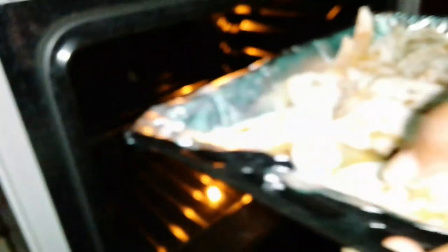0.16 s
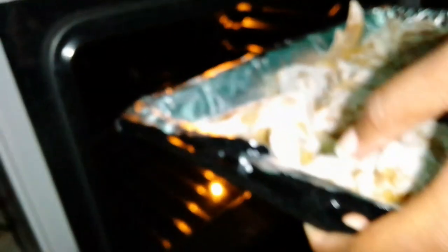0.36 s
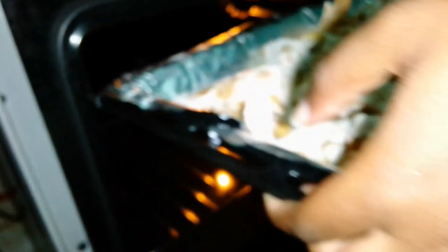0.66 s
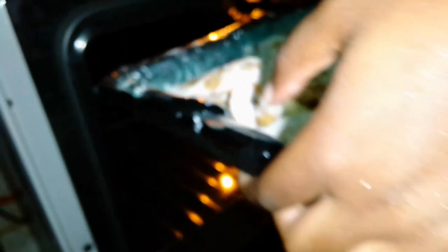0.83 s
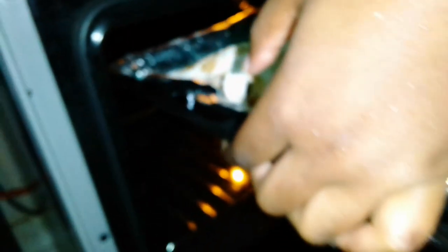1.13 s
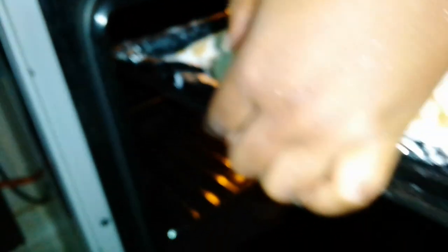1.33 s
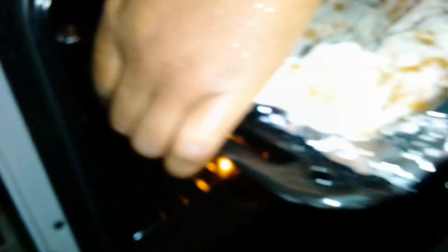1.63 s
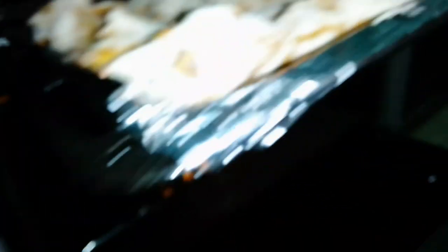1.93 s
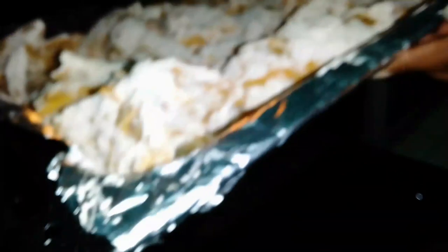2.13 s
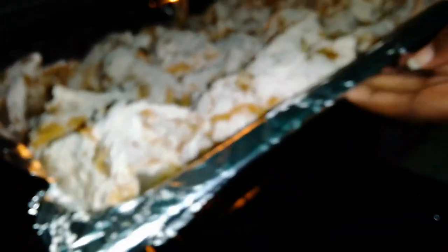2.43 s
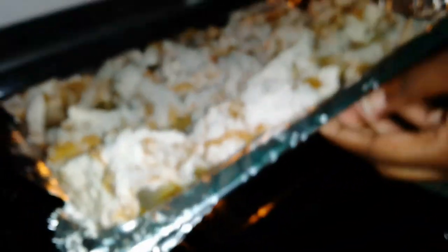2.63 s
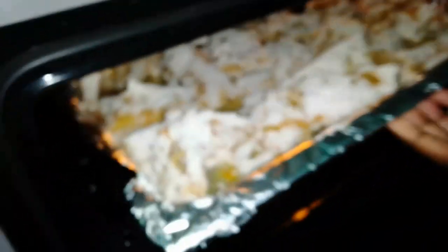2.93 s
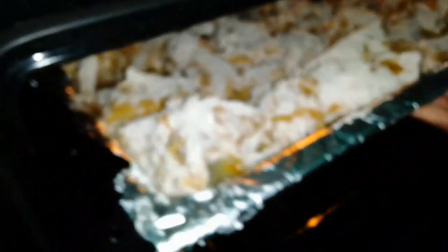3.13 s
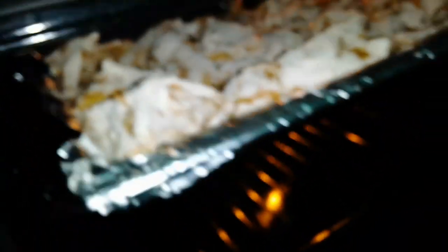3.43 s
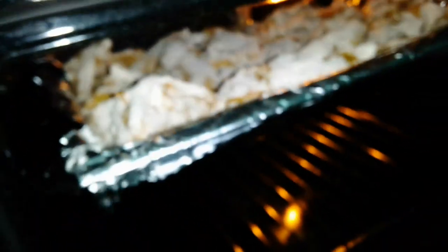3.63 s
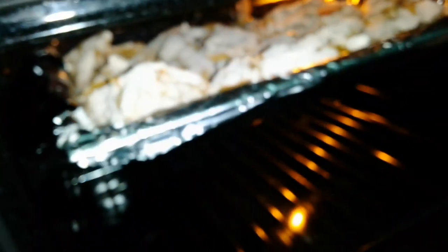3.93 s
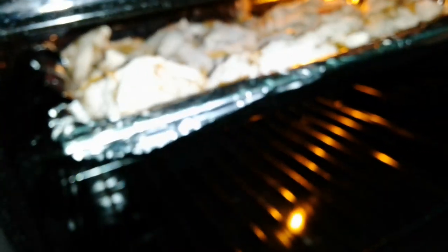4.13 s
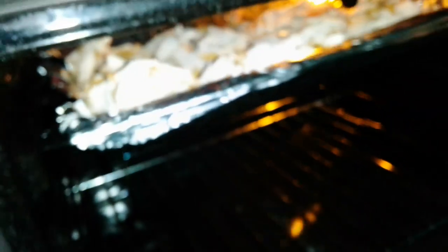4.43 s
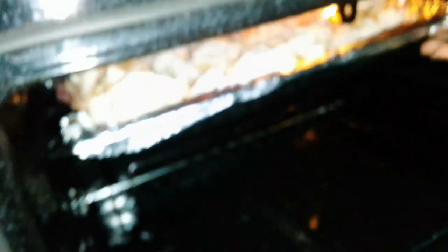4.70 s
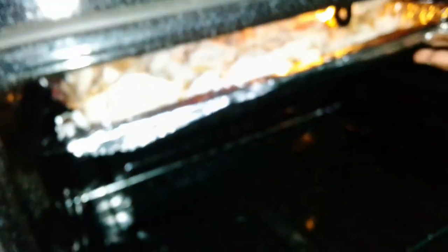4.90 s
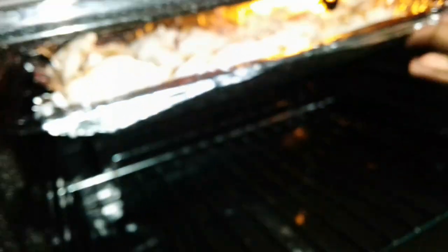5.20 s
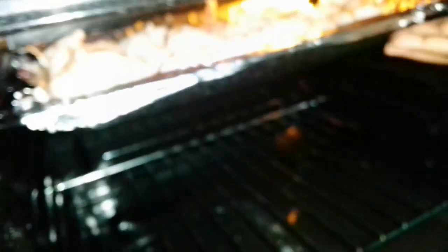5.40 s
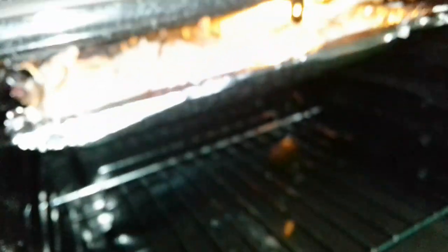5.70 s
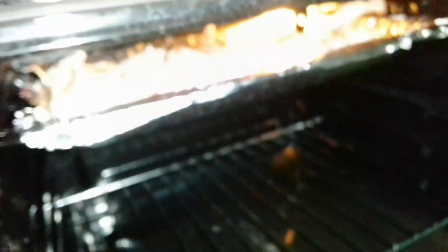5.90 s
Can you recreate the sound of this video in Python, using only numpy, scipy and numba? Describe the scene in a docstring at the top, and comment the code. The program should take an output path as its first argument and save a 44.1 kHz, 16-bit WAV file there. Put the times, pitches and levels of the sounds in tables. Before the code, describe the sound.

A quiet kitchen hiss with faint rubbing lasts barely 0.1 s before a foil-lined tray bangs on the oven rack: a hard, roaring metallic crash with a low boom, fading over about half a second. Foil crackles lightly at 0.3-0.8 s, then gives a sharp bright crinkle with a brief high squeal at 0.9 s. After a lull, a clank at 1.47 s starts dense foil crunching, scraping, squeals and low tray hums until about 2.3 s. A hard, bright clank hits at 2.56 s, followed by grinding, small thuds and a cluster of strong rattling clanks at 3.0-3.2 s. Lighter taps and a faint hum follow until 4.2 s. A dull, hollow thud lands at 4.42 s with a short low scrape and hum, then a small clink at 4.83 s. Tiny ticks remain over hiss, briefly dipping near 5.4 and 5.9 s. The phone is close; the oven adds a short tail.

```python
"""Over a quiet kitchen hiss with faint rubbing, a foil-lined metal tray soon bangs on an oven rack.
It then crinkles in the hands, scrapes, squeals, hums, rattles and thuds along the bars.
Noisy contact forces ring the foil, the tray's rim, sheet and base, the rack bars and the oven floor.
The oven adds a short tail to this handling; the bang is a fading roar of noise with a low boom.
The whole level dips briefly twice near the end, and a phone close by colours the sound."""
import sys
import numpy as np
from scipy import signal
from scipy.fft import rfft, irfft
from scipy.io import wavfile
from numba import njit

SR = 44100
rng = np.random.default_rng(int(sys.argv[2]) if len(sys.argv) > 2 else 0)


def generate_wav(signal):
    """Clip the signal to [-1, 1] and save it as 16-bit WAV at the path in sys.argv[1]."""
    frames = np.transpose(np.atleast_2d(signal))
    scaled = np.clip(frames, -1, 1) * 32767
    pcm = np.round(scaled).astype(np.int16)
    wavfile.write(sys.argv[1], SR, pcm)


N = 266849
T = np.arange(N) / SR  # time of every sample, s

# colour of the kitchen hiss: (frequency [Hz], relative level per Hz [dB])
HISS_COLOUR = [(15, -50), (25, -22), (80, -13), (170, -19), (354, -8), (607, -22.5), (734, -16.5),
               (962, -19.5), (2220, -21), (2550, -25), (16000, -26.5)]
HISS_DB = -62.5  # average (rms) level
# brief dips of the whole scene: (time [s], level [dB])
LEVEL_DIPS = [(5.36, 0), (5.37, -27), (5.41, -12.5), (5.47, -1.5), (5.885, -1), (5.895, -21.5), (6.02, -23),
              (6.05, -7.5)]
OVEN_T60_S, OVEN_DB = 0.28, -9  # time for the tail to fall 60 dB, and its level

# small ticks of settling metal: (time [s], level [dB])
TICKS = [(5.061, -45.5), (5.077, -43.5), (5.225, -55)]
TICK_HZ, TICK_WIDTH_HZ = 1296, 600

# colour of the first bang: (frequency [Hz], relative level per Hz [dB])
BANG_COLOUR = [(47, -57), (80, -32.5), (154, -8.5), (387, 0.5), (747, -7.5), (1160, -3), (1440, -13.5),
               (1750, -5.5), (2900, -10), (3240, -17.5), (5240, -6.5), (7120, -25.5), (15000, -54)]
# how fast each pitch of the bang dies: (frequency [Hz], time to fall 60 dB [s])
BANG_FADE = [(150, 0.6), (400, 0.63), (1040, 0.34), (2760, 0.26), (7000, .3), (9000, 0.15), (14000, .12)]
BANG_S, BANG_HOLD_S, BANG_RISE_S = .0873, 0.029, .0015
BANG_DB, BOOM_DB, BOOM_T60_S = -10, -15, 0.4

# ringing modes of each body; the wide rows stand for many close modes
# oven floor: (frequency [Hz], width [Hz], relative level [dB])
OVEN_FLOOR_MODES = [(59.97, 76, -23.5), (113, 22, -9), (221, 14, -5), (269, 22, -2.5), (279, 22, -2.5)]
# base of the tray: (frequency [Hz], width [Hz], relative level [dB])
TRAY_MODES = [(357, 37, -2.5), (386, 79, -3.5), (425, 26, 2.5), (467, 18, -5.5), (492, 15, -1),
              (536, 26, -6.5)]
# thin sheet of the tray: (frequency [Hz], width [Hz], relative level [dB])
SHEET_MODES = [(609, 15, -3.5), (700, 26, 3.5), (750, 42, -7.5), (872, 80, 0.5), (982, 110, -4),
               (1006, 110, 0.5), (1140, 54, -3.5), (1282, 200, -2.5), (893, 1200, -6.5)]
# rack bars: (frequency [Hz], width [Hz], relative level [dB])
BAR_MODES = [(1705, 9.6, -12), (1945, 70, -15), (1980, 110, -5.5), (2244, 190, -0.5), (2259, 160, 3),
             (2562, 92, -9.5), (3120, 110, -9), (2330, 1400, -7.5)]
# rim of the tray: (frequency [Hz], width [Hz], relative level [dB])
RIM_MODES = [(3337, 79, -9.5), (3730, 40, 4), (4200, 13, -12), (4890, 40, 4), (4530, 3200, -4)]
# foil: (frequency [Hz], width [Hz], relative level [dB])
FOIL_MODES = [(5320, 180, -3), (5810, 27, 0), (5444, 240, -2.5), (5840, 330, 1.5), (6130, 220, -2.5),
              (6550, 190, 3), (7560, 280, -14.5), (7840, 140, -11), (6375, 2800, -8)]
# bright crackle at the top: (frequency [Hz], width [Hz], relative level [dB])
CRACK_MODES = [(8900, 600, 2.5), (9350, 14000, 4), (11500, 6700, -13.5)]
WANDER_DB, WANDER_PER_S = 3.0, 14  # random spread of a mode's drive, and new values per second

# narrow drifting tones: squeals, tray hum and ringing of the metal under contact:
# (start [s], end [s], first pitch [Hz], last pitch [Hz], first level [dB], last level [dB])
DRIFTING_TONES = [(0.91, 1.03, 6250, 6000, -24, -40.5), (1.236, 1.44, 1430, 1860, -62, -57),
                  (1.487, 1.654, 1990, 2380, -33.5, -45.5), (1.683, 1.93, 2490, 2090, -25.5, -54.5),
                  (1.793, 2.037, 5830, 5860, -34.5, -39.5), (1.99, 2.2, 1270, 1280, -32.5, -53.5),
                  (1.492, 1.628, 500, 517, -36.5, -51.5), (1.661, 1.905, 502.5, 529, -34, -56.5),
                  (1.983, 2.194, 467, 440, -38, -46.5), (2.583, 3.006, 600, 695, -48.5, -40),
                  (2.64, 2.825, 5250, 5360, -27, -46), (2.638, 2.977, 2325, 2440, -49, -35.5),
                  (2.99, 3.216, 2500, 2220, -34, -40.5), (3.325, 3.491, 2346, 2354, -32, -48.5),
                  (3.617, 4.16, 452, 453, -48, -57.5), (4.588, 4.758, 385, 337, -36, -56),
                  (1.418, 1.618, 7000, 6720, -33, -38.5), (1.7, 1.817, 6900, 6800, -28, -42)]
TONE_WIDTH_HZ, TONE_FADE_S = 110, 0.011
TONE_BREAKUP = 2.2  # power on the wandering drive: higher is more broken

# rubbing pressure: (time [s], on foil [dB], on edge [dB], on bars [dB], on sheet [dB], on base [dB])
RUBBING = [(0.0, -56, -61, -55, -67, -64), (0.12, -44, -51, -63, -52, -63.5),
           (0.25, -71, -59, -64, -59, -37), (0.44, -52, -58, -55.5, -58, -62.5),
           (0.72, -67, -58, -58.5, -57.5, -68.5), (1.2, -49, -67, -54.5, -60.5, -69),
           (1.43, -49, -56, -50.5, -55.5, -61), (1.49, -28, -55, -51, -54, -64),
           (1.57, -30, -62, -64, -53, -57), (1.63, -36.5, -33, -39.5, -53.5, -57),
           (2.03, -46, -53, -43.5, -45.5, -50), (2.3, -49, -45.5, -46.5, -50.5, -56),
           (2.52, -45, -44, -39.5, -46, -56.5), (2.67, -54, -41, -39, -33, -41),
           (2.81, -63, -57, -36.5, -54, -41.5), (3.04, -58, -46, -48.5, -37, -41.5),
           (3.26, -68, -66, -50, -54, -61), (3.47, -69.5, -80, -57, -50.5, -49),
           (3.88, -72, -76, -57, -60.5, -53), (4.16, -78.5, -82.5, -62.5, -61.5, -67.5),
           (4.37, -67, -74, -72.5, -64.5, -61), (4.51, -62, -71, -57, -51, -36.5),
           (4.65, -70, -68.5, -55, -53.5, -43.5), (5.0, -86, -75, -77, -69, -76)]
GRAINS_PER_S, GRAIN_SPREAD_DB = 610, 3
RATTLE_GRAIN = 0.47  # amount of grainy rubbing mixed into the noise of the blows

# creases of the foil:
# (time [s], force on foil [dB], on bars [dB], hold [s], time to fall 60 dB [s])
CREASES = [(.267, -24.5, -34, .0025, 0.064), (0.386, -41.5, -44.5, .005, 0.05),
           (0.533, -50, -57, .009, 0.045), (0.58, -43, -46.5, .008, 0.12), (0.643, -40, -35.5, .011, 0.045),
           (0.785, -41.5, -40.5, .0076, 0.045), (0.9065, -15.5, -60, 0.0018, 0.038),
           (0.914, -32, -55, .007, 0.025), (0.948, -19.5, -36, .003, 0.016), (0.981, -36, -45.5, .011, .03),
           (1.193, -41, -45.5, .009, 0.079), (1.378, -44, -47.5, .035, 0.076),
           (1.415, -24, -34.5, .011, 0.19), (1.447, -21, -30, .006, 0.085), (1.601, -28, -37, .0064, 0.017),
           (1.626, -13.5, -28, .006, .03), (1.705, -15.5, -21.5, .005, 0.051),
           (1.721, -16, -25, .02, 0.056), (1.766, -33, -27, .009, 0.053), (1.92, -23.5, -38, .007, 0.02),
           (2.232, -35, -48, .009, 0.086), (2.28, -27.5, -39, .003, 0.099),
           (2.344, -48.5, -44, .009, 0.095)]
# clanks of the tray on the rack: (time [s], force on edge [dB], on bars [dB], on sheet [dB],
# on base [dB], hold [s], time to fall 60 dB [s])
CLANKS = [(1.061, -57, -49.5, -61, -57, 0.0091, .035), (1.465, -15, -11.5, -48, -28, 0.0063, 0.046),
          (1.485, -30.5, -26, -50, -41, 0.015, 0.096), (1.558, -38, -36.5, -52, -51, 0.0056, 0.024),
          (1.686, -24, -36, -32, -50, 0.014, 0.091), (1.993, -32, -26.5, -29, -37, 0.011, 0.13),
          (2.028, -38, -23, -49, -35, 0.0082, 0.078), (2.098, -40, -24, -30.5, -52.5, 0.0041, 0.015),
          (2.192, -42.5, -63, -69, -51, 0.0053, 0.025), (2.384, -37.5, -41, -47, -44, 0.0053, 0.021),
          (2.488, -40, -30, -34.5, -46.5, 0.018, 0.18), (2.552, -20, -22, -27, -27.5, 0.0084, 0.071),
          (2.563, -5.5, -8, -40, -48, 0.001, 0.0061), (2.592, -20, -18.5, -28.5, -35, 0.0025, 0.088),
          (2.671, -42, -27, -32, -30, 0.0086, 0.034), (2.752, -35.5, -43, -39, -36, .01, 0.036),
          (3.028, -30.5, -15.5, -24.5, -25.5, 0.014, 0.038),
          (3.061, -41, -11.5, -14.5, -25.5, 0.0038, .017), (3.105, -42, -43, -33, -34, 0.021, 0.061),
          (3.158, -33.5, -27, -42, -52, 0.0051, 0.033), (3.175, -33, -22.5, -20.5, -37, 0.0028, 0.018),
          (3.259, -40.5, -32, -46, -40.5, 0.0094, 0.14), (3.334, -40, -33, -58, -41, 0.0033, .04),
          (3.36, -42, -31, -67, -66, 0.0053, 0.11), (3.456, -47.5, -59, -67, -72.5, 0.0045, 0.037),
          (3.472, -45, -37.5, -50, -45, 0.0039, 0.033), (3.61, -74, -45.5, -70, -54, 0.0066, .04),
          (3.697, -54, -47, -54, -48, 0.031, .04), (3.807, -57.5, -49.5, -60, -64.5, 0.0076, .028),
          (4.07, -57.5, -52, -54.5, -59, 0.0036, 0.036), (4.827, -45.5, -39.5, -50, -44.5, 0.01, .05),
          (4.848, -61, -55, -66, -55, 0.017, 0.033), (4.897, -77, -64, -76, -82.5, .0035, 0.038),
          (5.018, -77.5, -60, -73.5, -78, .0065, 0.04), (5.221, -77, -59, -70.5, -75, 0.0094, 0.036),
          (5.494, -83.5, -63.5, -76, -77.5, 0.02, .044), (5.63, -78, -62.5, -59.5, -71, .01, 0.04),
          (5.819, -81, -66.5, -64, -76, .018, .036)]
# thuds of the tray's underside: (time [s], force on bars [dB], on sheet [dB], on base [dB],
# on oven floor [dB], hold [s], time to fall 60 dB [s])
THUDS = [(2.875, -26.5, -41, -31.5, -54.5, 0.0045, 0.033), (2.945, -29, -33, -30, -60, 0.0033, 0.035),
         (3.001, -32.5, -52, -28.5, -71, 0.017, 0.076), (3.639, -54, -42, -52, -66, .003, 0.048),
         (3.733, -65, -39.5, -45, -62.5, 0.0063, .035), (3.75, -47.5, -51.5, -33, -42.5, 0.0023, .027),
         (3.79, -77, -66, -45.5, -71, 0.0044, 0.031), (4.322, -52.5, -45.5, -48.5, -63.5, 0.026, .047),
         (4.353, -52.5, -45, -43, -55.5, .06, .052), (4.413, -42, -33.5, -21, -41, 0.0073, 0.11),
         (4.42, -28.5, -32, -15.5, -24, 0.0012, 0.027), (4.447, -62, -40, -29, -27.5, 0.016, 0.056),
         (4.481, -65, -36, -44, -29, 0.007, 0.053), (4.597, -61, -55, -32.5, -36, .015, 0.025),
         (4.657, -79, -63, -49, -43, 0.0079, .05)]
# sharp snaps of the foil, mostly treble: (time [s], force [dB], hold [s])
SNAPS = [(0.265, -27.5, 0.006), (0.536, -41, 0.0044), (0.585, -46.5, 0.006), (0.647, -31, 0.0079),
         (0.7865, -42, 0.0067), (0.909, -36, 0.006), (0.944, -42, 0.006), (1.3866, -44.5, 0.006),
         (1.413, -34, 0.006), (1.449, -38, 0.006), (1.564, -37.5, 0.0065), (1.606, -34, 0.006),
         (1.6276, -46, 0.006), (1.697, -28, 0.006), (1.879, -44, 0.006), (1.917, -42.5, 0.006),
         (1.9943, -39, 0.006), (2.226, -42, 0.006), (2.281, -37.5, 0.006), (2.35, -38.5, 0.006),
         (2.5614, -18.5, 0.006), (3.02, -43, 0.006), (3.1082, -49, 0.006), (3.164, -35, 0.0067),
         (3.266, -44, 0.006), (3.3342, -43, 0.006), (3.3582, -45, 0.006), (4.832, -47.5, 0.0074)]
SNAP_T60_S = 0.048
CREASE_RISE_S, CLANK_RISE_S, THUD_RISE_S, SNAP_RISE_S = .001, 0.0017, 0.0019, .001
TICK_DB, TICK_S = 4, .002  # extra force around the end of each rise, and its time scale
PUSH_S, PUSH_DB = 0.0014, -7  # a thud opens with a soft push, this far from its force on the base
CLICK_DB = 6.5  # a crease opens with a click, this far above its force on the foil

# the seven forces are numbered in the column order of the next table
FOIL, EDGE, BARS, SHEET, BASE, OVEN_FLOOR, SNAP = range(7)
# how strongly each force reaches each ringing body, one row per body: (from foil [dB], edge [dB],
# bars [dB], sheet [dB], base [dB], oven floor [dB], snap [dB])
REACH_DB = {"foil": (-3, -3.5, -39.5, -56.5, -70.5, -73, -7),
            "crack": (-18, -25, -29, -48.5, -61, -70, -5.5),
            "rim": (-13, -1, -15.5, -40.5, -62, -69, -16.5), "bars": (-41, -39.5, 0, -31, -51, -70, -29.5),
            "sheet": (-51.5, -54, -17, 1, -26.5, -40, -40.5),
            "tray": (-62.5, -60.5, -40, -26.5, -0.5, -18, -61.5),
            "oven floor": (-50.5, -41.5, -38, -32, -16, 0, -60)}

# tone colour of the phone's microphone: (frequency [Hz], level [dB])
MIC_COLOUR = [(30, -1), (120, -4), (200, 3), (7000, 0), (9000, 0.5), (16000, -2.5)]
TOP_HZ = 16050  # almost nothing passes above this
DRIVE = 1.13  # how hard loud peaks are squeezed
OFFSET = -0.0011  # steady voltage of the input stage


def undb(db):
    """Turn decibels into a plain multiplier."""
    return 10 ** (np.asarray(db) / 20)


def unit(x):
    """Scale to an average (rms) size of 1."""
    return x / np.sqrt(np.mean(x ** 2))


def on_log(hz, table):
    """Read a table between its rows, with pitch spaced as the ear hears it."""
    table = np.array(table)
    return np.interp(np.log(hz), np.log(table[:, 0]), table[:, 1])


def ring(x, hz, width_hz):
    """A simple resonance, gain 1 at its centre; a narrower one rings longer."""
    return signal.lfilter(*signal.iirpeak(min(hz, .45 * SR), hz / width_hz, fs=SR), x)


@njit
def glide(x, hz, sharpness):
    """A resonance whose centre moves, gain 1 at the centre."""
    y, band, low = np.empty(len(x)), 0., 0.
    for i in range(len(x)):
        g = np.tan(np.pi * hz[i] / SR)
        v = (band + g * (x[i] - low)) / (1 + g * (g + 1 / sharpness[i]))
        low += 2 * g * v
        band = 2 * v - band
        y[i] = v / sharpness[i]
    return y


def wander():
    """The contact point moves, so a mode is driven now harder, now softer, at random."""
    count = int(N / SR * WANDER_PER_S) + 2
    gain = undb(WANDER_DB * rng.standard_normal(count))
    return np.interp(T * WANDER_PER_S, np.arange(count), unit(gain))


def body(force, modes):
    """A struck body answers with its own modes; white force of rms 1 gives sound of rms near 1."""
    centres = np.array(modes)[:, 0]
    edges = centres.min() / 1.12, min(centres.max() * 1.076, .45 * SR)
    band = signal.butter(3, edges, "band", fs=SR, output="sos")
    force = signal.sosfilt(band, force)
    sound, power = 0, 0
    for k, (hz, width_hz, db) in enumerate(modes):
        sign = (-1) ** k  # neighbouring modes move in opposite directions
        sound = sound + sign * undb(db) * ring(force * wander(), hz, width_hz)
        power += undb(2 * db) * np.pi * width_hz / SR
    return sound / np.sqrt(power)


def hiss():
    """Steady kitchen and microphone noise: random noise given a fixed colour."""
    hz = np.maximum(np.arange(N // 2 + 1) * SR / N, 20)
    noise = irfft(rfft(rng.standard_normal(N)) * undb(on_log(hz, HISS_COLOUR)), N)
    return unit(noise) * undb(HISS_DB)


def oven_tail(dry):
    """Many overlapping echoes in the oven: fading noise smears the sound."""
    t = T[:SR // 3]
    build_up = np.minimum(t / 0.025, 1)
    echoes = rng.standard_normal(len(t)) * undb(-60 * t / OVEN_T60_S) * build_up
    echoes = echoes / np.sqrt(np.sum(echoes ** 2))
    return undb(OVEN_DB) * signal.fftconvolve(dry, echoes)[:N]


def ticks():
    """Settling metal: lone clicks pass twice through one short resonance."""
    click = np.zeros(N)
    for s, db in TICKS:
        click[int(s * SR)] = undb(db) * SR / (np.pi * TICK_WIDTH_HZ)
    return ring(ring(click, TICK_HZ, TICK_WIDTH_HZ), TICK_HZ, TICK_WIDTH_HZ)


def bang():
    """The tray drops on the rack: bands of noise roar and fade by pitch, and low modes boom on."""
    t = np.maximum(T - BANG_S, 0)
    rise = np.minimum(t / BANG_RISE_S, 1)
    after = np.maximum(t - BANG_HOLD_S, 0)  # full level is held for a moment before the fade
    roar = 0
    for hz in 90 * 2 ** np.arange(0, 7.5, 1 / 3):  # three bands per octave
        band = rng.standard_normal(N)
        for _ in range(3):
            band = ring(band, hz, hz / 2.5)
        level_db = on_log(hz, BANG_COLOUR) - 60 * after / on_log(hz, BANG_FADE)
        roar = roar + undb(level_db) * band
    early = (t > 0) & (t < .04)
    roar = rise * roar / np.std(roar[early])
    boom_force = rng.standard_normal(N) * undb(-60 * after / BOOM_T60_S) * rise
    boom = body(boom_force, OVEN_FLOOR_MODES + TRAY_MODES + SHEET_MODES)
    return undb(BANG_DB) * roar + undb(BOOM_DB) * boom


def grains():
    """Metal catches and slips on metal: tiny impacts of very uneven size over steady noise."""
    hit = rng.random(N) < GRAINS_PER_S / SR
    size = undb(GRAIN_SPREAD_DB * rng.exponential(size=N))
    impacts = hit * size * rng.standard_normal(N)
    return unit(impacts + 0.48 * rng.standard_normal(N))


def drifting_tones(rub):
    """Metal under contact squeals, hums or rings: rubbing noise through one narrow, drifting resonance."""
    out = 0
    loudness = np.sqrt(SR / (np.pi * TONE_WIDTH_HZ))  # makes up for the narrow filter
    for start, end, from_hz, to_hz, from_db, to_db in DRIFTING_TONES:
        fade = np.clip(np.minimum(T - start, end - T) / TONE_FADE_S, 0, 1)
        hz = np.interp(T, [start, end], [from_hz, to_hz])
        level = undb(np.interp(T, [start, end], [from_db, to_db]))
        broken_rub = rub * unit(wander() ** TONE_BREAKUP)
        tone = glide(broken_rub, hz, hz / TONE_WIDTH_HZ) * loudness
        out = out + fade * level * tone
    return out


def opening_pushes():
    """First touch: each thud pushes smoothly on the tray's base, each crease clicks on the foil."""
    force, shape = np.zeros((7, N)), np.hanning(int(PUSH_S * SR))
    for s, _, _, base_db, *_ in THUDS:
        i = int(s * SR)
        force[BASE, i:i + len(shape)] = undb(base_db + PUSH_DB) * shape
    for s, foil_db, *_ in CREASES:
        force[FOIL, int(s * SR)] = undb(foil_db + CLICK_DB)
    return force


def contact_power():
    """Power of the seven forces: each contact builds up, chatters for a while and dies; powers add."""
    power = np.zeros((7, N))
    snaps = [(*row, SNAP_T60_S) for row in SNAPS]
    kinds = [(CREASES, [FOIL, BARS], CREASE_RISE_S),
             (CLANKS, [EDGE, BARS, SHEET, BASE], CLANK_RISE_S),
             (THUDS, [BARS, SHEET, BASE, OVEN_FLOOR], THUD_RISE_S),
             (snaps, [SNAP], SNAP_RISE_S)]
    for table, parts, rise_s in kinds:
        for s, *force_db, hold_s, t60_s in table:
            i = int(s * SR)
            t = T[:min(N - i, SR // 4)]
            tick_db = TICK_DB * np.exp(-((t - rise_s) / TICK_S) ** 2)  # first full contact is hardest
            fade_db = 60 * np.maximum(t - rise_s - hold_s, 0) / t60_s
            envelope = undb(tick_db - fade_db) * np.minimum(t / rise_s, 1)
            power[parts, i:i + len(t)] += (undb(force_db)[:, None] * envelope) ** 2
    return power


def handling():
    """Blows and rubbing drive every body, each force reaching each body by its own share."""
    rub = grains()
    rattle = unit(rng.standard_normal(N) + RATTLE_GRAIN * rub)
    blow_power, push = contact_power(), opening_pushes()
    rub_power = np.zeros((7, N))
    times, *curves_db = np.array(RUBBING).T
    for part, db in enumerate(curves_db):  # foil, edge, bars, sheet, base
        rub_power[part] = undb(np.interp(T, times, db, right=-120)) ** 2
    out = drifting_tones(rub) + ticks()
    bodies = [FOIL_MODES, CRACK_MODES, RIM_MODES, BAR_MODES, SHEET_MODES, TRAY_MODES, OVEN_FLOOR_MODES]
    for modes, reach_db in zip(bodies, REACH_DB.values()):
        share = undb(reach_db)
        blow_force = np.sqrt(share ** 2 @ blow_power) * rattle
        rub_force = np.sqrt(share ** 2 @ rub_power) * rub
        out = out + body(blow_force + rub_force + share @ push, modes)
    return out


def scene():
    """Add the handling, its oven tail, the bang and the hiss, then dip the whole level twice."""
    handled = handling()
    mix = handled + oven_tail(handled) + bang() + hiss()
    dips = undb(np.interp(T, *np.transpose(LEVEL_DIPS)))
    return (mix * dips)[None]


def record(dry):
    """The phone thins the bass, dulls the top, squeezes loud peaks and adds a small steady offset."""
    hz = np.maximum(np.arange(N // 2 + 1) * SR / N, 20)
    coloured = irfft(rfft(dry) * undb(on_log(hz, MIC_COLOUR)), N)
    rounded = np.tanh(DRIVE * coloured) / DRIVE + OFFSET
    low_pass = signal.ellip(10, .2, 80, TOP_HZ, fs=SR, output="sos")
    return signal.sosfilt(low_pass, rounded)


dry = scene()
out = record(dry)
generate_wav(out)
```